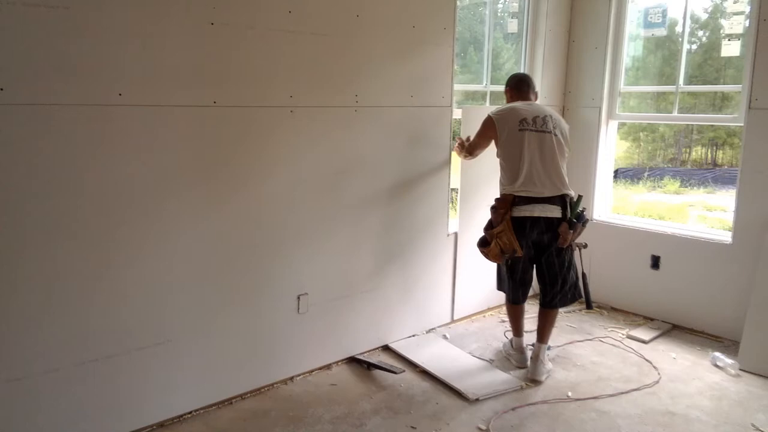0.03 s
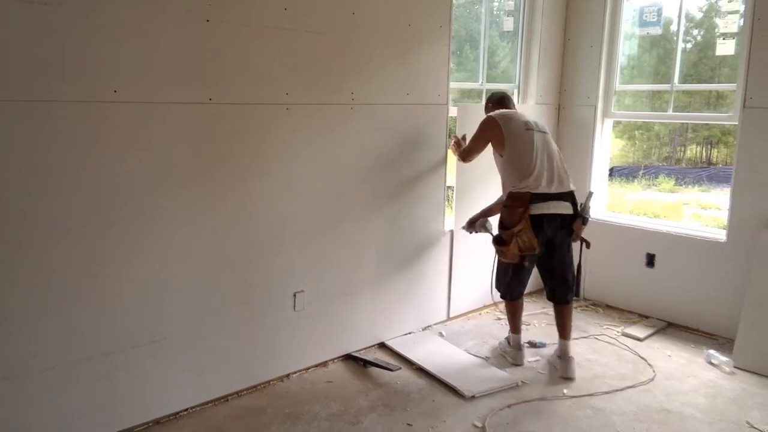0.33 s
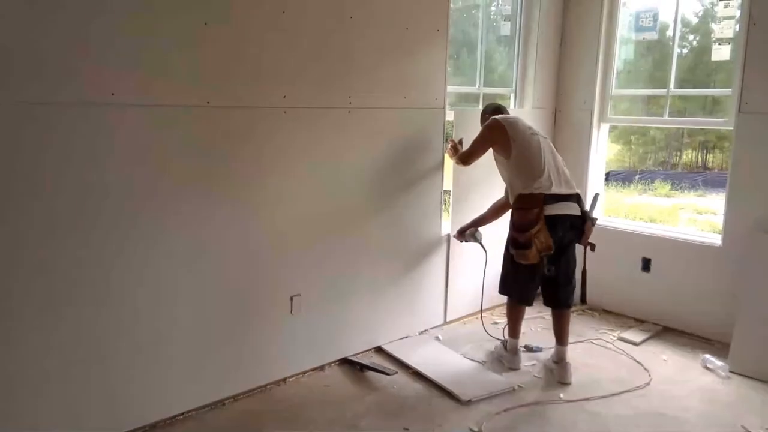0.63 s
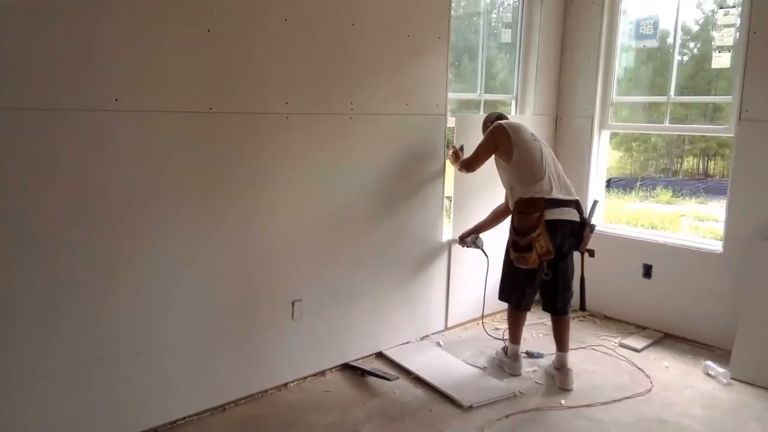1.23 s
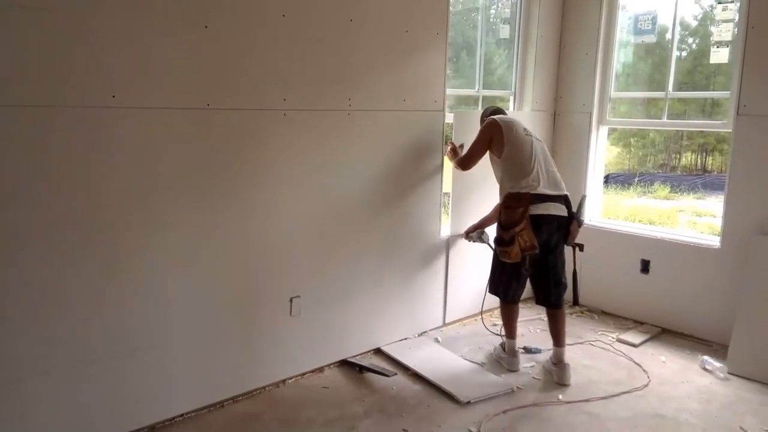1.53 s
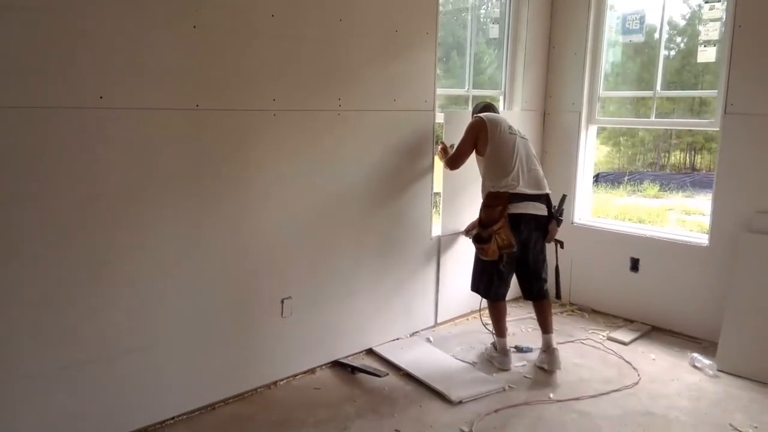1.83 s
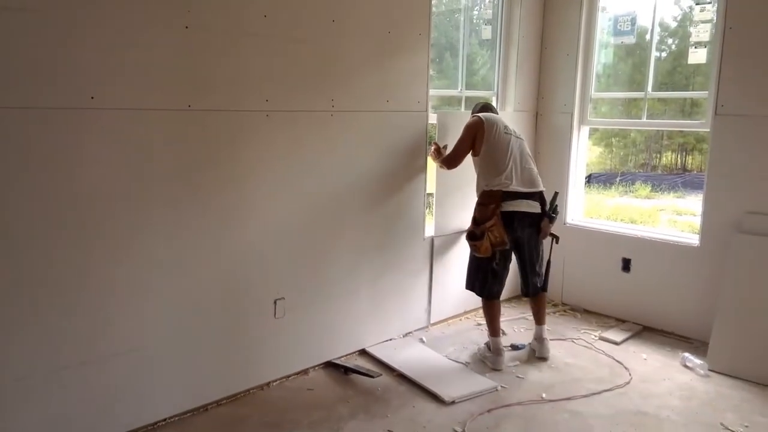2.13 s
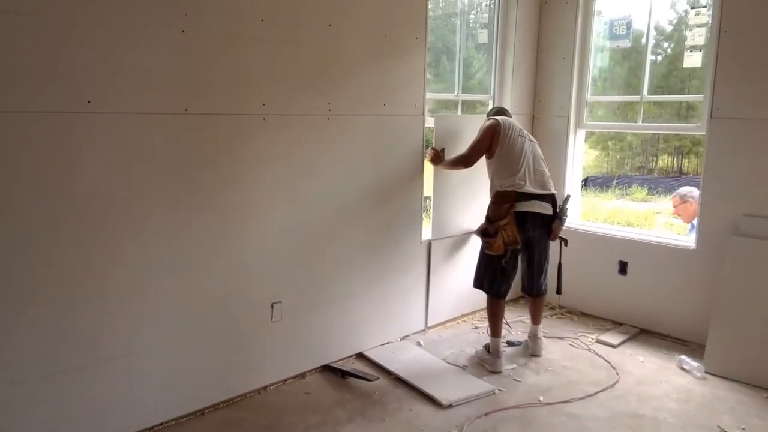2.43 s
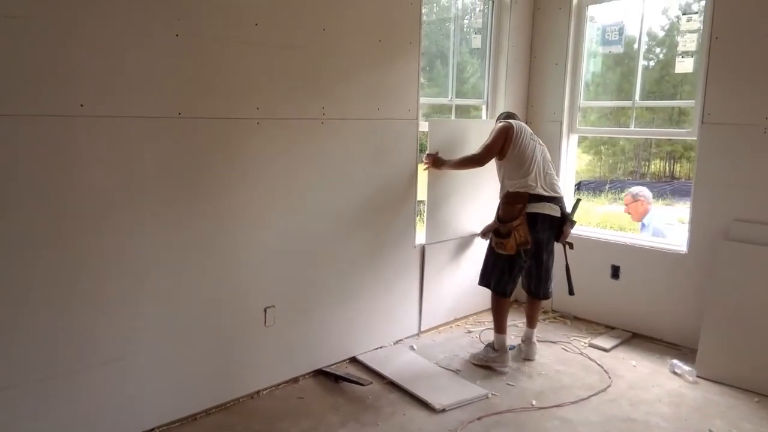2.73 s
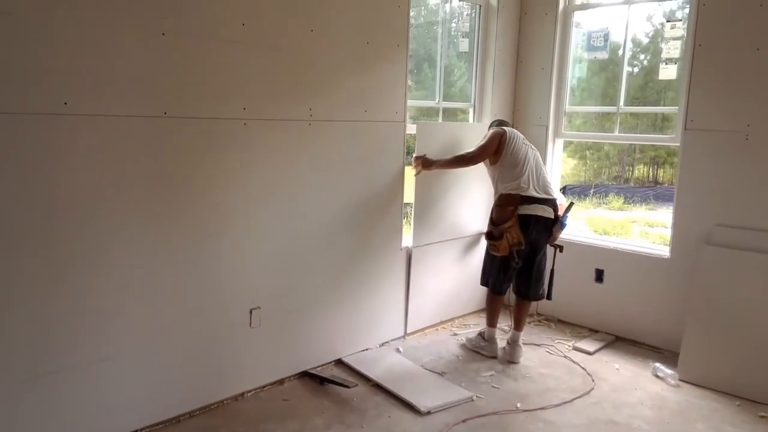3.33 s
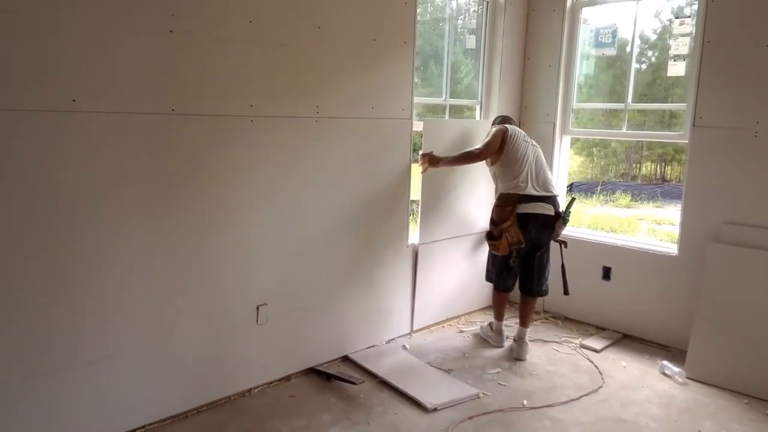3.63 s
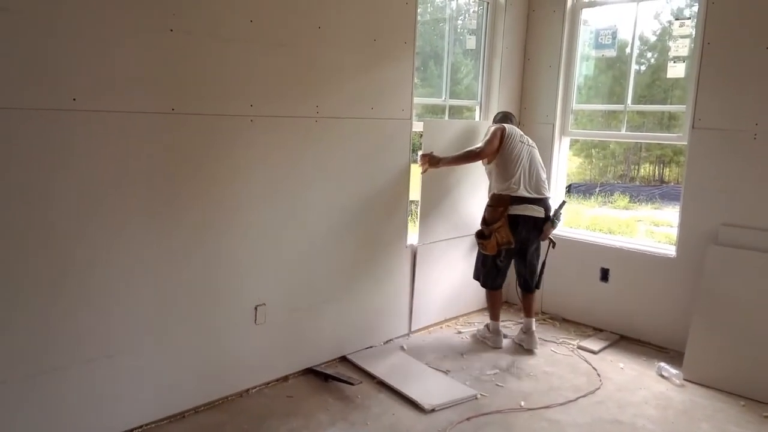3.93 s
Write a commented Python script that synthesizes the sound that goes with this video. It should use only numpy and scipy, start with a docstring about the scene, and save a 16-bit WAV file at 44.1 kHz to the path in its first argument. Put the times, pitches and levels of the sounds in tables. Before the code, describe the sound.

A corded rotary tool runs with an airy whine, then bites into drywall and screams steadily, with squeals and gritty grinding. The cut eases near the end. It is heard from a few metres away in a bare, echoing room.

```python
"""Rushing air, a fan whistle and a shaft hum fade in: a corded rotary cut-out tool spinning free,
a few metres away in a bare, unfinished room. Then the bit bites into drywall and screams on multiples
of the shaft rate, which sags under load and recovers as the cut eases. Single overtones flare into
squeals, and every tone beats with its own echoes. The sheet rumbles when pushed, grinds under the
bit and scrapes once."""
import sys
import numpy as np
from scipy import signal
from scipy.fft import rfft, irfft
from scipy.io import wavfile
from scipy.ndimage import uniform_filter1d

SR = 44100
rng = np.random.default_rng(int(sys.argv[2]) if len(sys.argv) > 2 else 0)


def bounce(signal):
    """Save signal as a 16-bit WAV file at the path given by the first command-line argument."""
    frames = np.transpose(np.atleast_2d(signal))
    limited = np.clip(frames, -1, 1)
    pcm = np.round(limited * 32767).astype(np.int16)
    wavfile.write(sys.argv[1], SR, pcm)


N = 176400
T = np.arange(N) / SR
BITE_S = .865   # the bit enters the board

# Loudness of the cut, ridden by both scream and grinding: time_s, level_db
CUT_LEVEL = [(.78, -44), (.86, -39), (.885, -23), (.95, -29), (1.02, -26), (1.12, -26), (1.26, -27),
             (1.38, -19.5), (1.64, -18), (1.71, -21), (1.78, -18.5), (2.42, -19), (2.53, -20), (2.63, -16),
             (2.75, -17.5), (2.98, -17), (3.25, -18.5), (3.48, -18.5), (3.6, -19.5), (3.78, -19.5),
             (3.92, -29.5)]


def from_db(db):
    """Decibels to gain."""
    return 10 ** (np.asarray(db) / 20)


def unit_rms(x):
    """Scale to rms 1."""
    return x / np.sqrt(np.mean(np.abs(x) ** 2) + 1e-20)


def automation(points, lead_s=0):
    """Straight ramps between (time_s, value) points, held at both ends."""
    return np.interp(T + lead_s, *np.transpose(points))


def drift(rate_hz):
    """A smooth random wander with rms near 1."""
    hop, settle = 40, 2000
    pole = np.exp(-2 * np.pi * hop * rate_hz / SR)
    white = rng.standard_normal(N // hop + settle + 2)
    slow = signal.lfilter([1], [1, -2 * pole, pole * pole], white)[settle:]
    return np.interp(np.arange(N) / hop, np.arange(len(slow)), unit_rms(slow))


def coloured_noise(colour):
    """Noise shaped by an EQ curve of (frequency_hz, gain_db) points, at rms 1."""
    hz, db = np.transpose(colour)
    bin_hz = np.maximum(np.arange(N // 2 + 1) * SR / N, 1)
    eq = from_db(np.interp(np.log(bin_hz), np.log(hz), db))
    return unit_rms(irfft(rfft(rng.standard_normal(N)) * eq, N))


def swell(peak_s, half_width_s):
    """A rise, short hold and fall: a bell with a flattened top."""
    return np.exp(-.5 * np.abs((T - peak_s) / half_width_s) ** 3)


def decay(start_s, decay_s):
    """A sudden attack and an exponential fall."""
    return (T > start_s) * np.exp(-np.abs(T - start_s) / decay_s)


def bare_room(reverb_db):
    """The direct sound plus a dense tail off bare walls, its energy reverb_db against the direct."""
    t60_s, first_echo_s = .59, .004
    t = T[:SR]
    response = rng.standard_normal(SR) * from_db(-60 * t / t60_s) * (t > first_echo_s)
    response *= from_db(reverb_db) / np.linalg.norm(response)
    response[0] = 1
    return response / np.linalg.norm(response)


def tone_in_room(phase, room, levelling_s=.15):
    """A complex tone beating with its own echoes, levelled so its real part stays near rms 1."""
    wet = signal.fftconvolve(np.exp(1j * phase), room)[:N]
    window = int(levelling_s * SR)
    power = uniform_filter1d(np.abs(wet) ** 2, window)
    power = uniform_filter1d(power, window // 2) + 1e-12
    return np.sqrt(2 / power) * wet


def shaft_spin():
    """Shaft rate and angle: nearly steady when free, sagging and unsteady in the board."""
    # Shaft rate through the cut: time_s, rate_hz
    cutting_speed = [(0.88, 497.6), (1.22, 483.8), (1.23, 493), (1.51, 485), (1.86, 489.2), (2.25, 479),
                     (2.39, 475.7), (2.54, 469.8), (3.5, 467.7), (3.75, 499.8), (3.78, 506.4), (3.98, 500),
                     (4.0, 502)]
    free_hz, free_wobble, cut_wobble = 497.7, .00062, .001585   # wobble is a share of the rate
    cutting = T > BITE_S
    cutting_hz = automation(cutting_speed, lead_s=.01996)   # the shaft changes pace ahead of the room
    shaft_hz = np.where(cutting, cutting_hz, free_hz)
    wobble = np.where(cutting, cut_wobble, free_wobble) * drift(rate_hz=14)
    return shaft_hz, 2 * np.pi * np.cumsum(shaft_hz * (1 + wobble)) / SR


def air_rush(angle):
    """Cooling air and gypsum dust, flickering and pulsing a little with each turn."""
    # Level of the hiss as heard, including the recorder's gain drop at the bite: time_s, level_db
    hiss_level = [(.4, -19.5), (.55, -18), (.68, -20.5), (.85, -16.5), (.885, -26), (1.0, -30),
                  (1.12, -25.5), (1.25, -27), (2.4, -27), (3.4, -28.5), (3.8, -25), (4, -22.5)]
    # Bright, breathy EQ of the airflow: frequency_hz, gain_db
    air_colour = [(15, -60.5), (40, -55.5), (95, -44.5), (130, -36), (220, -37.5), (300, -28), (560, -15),
                  (850, -6.5), (1100, -6.5), (1350, 3.5), (1650, -1.5), (2000, -1), (2600, -1.5), (3500, 5),
                  (4300, -0.5), (5100, -5.5), (5900, -14.5), (6500, -27), (7000, -39.5)]
    pulse_depth, flicker_db = .13, 1.0
    flow = coloured_noise(air_colour) * (1 + pulse_depth * np.cos(angle))
    return flow * from_db(automation(hiss_level) + flicker_db * drift(rate_hz=16))


def fan_whistle(angle):
    """The fan's fluttering whistle, dipping as the recorder's gain drops at the bite."""
    # Level of the whistle as heard: time_s, level_db
    whistle_level = [(.23, -39.5), (.255, -23.5), (.5, -22), (.67, -26), (.85, -16), (.872, -24.5),
                     (1.4, -33), (3.5, -35), (3.75, -20.5), (3.86, -31), (3.95, -27), (4, -22)]
    # Partials of the whistle: shaft_multiple, gain_db
    partials = [(7, -19.5), (8, 1), (12, -28.5)]
    gain_dip_db, flutter_db = -8, 2.0
    room = bare_room(reverb_db=10)
    whistle = sum(from_db(db) * tone_in_room(multiple * angle, room).real for multiple, db in partials)
    level_db = automation(whistle_level) + gain_dip_db * decay(BITE_S, decay_s=.06)
    return whistle * from_db(level_db + flutter_db * drift(rate_hz=21))


def shaft_hum(angle):
    """The unbalanced shaft hums at its turning rate, wavering in level."""
    # Level of the hum as heard: time_s, level_db
    hum_level = [(0.4, -38.5), (0.84, -36), (0.88, -53), (0.97, -32), (1.11, -47.5), (1.2, -38.5),
                 (1.59, -35), (1.69, -58), (1.82, -38), (2.01, -45), (2.17, -31), (3.37, -43.5),
                 (3.47, -37), (3.61, -54), (3.63, -40.5), (4.0, -47)]
    waver_db = 1.5
    hum = tone_in_room(angle, bare_room(reverb_db=-3.5)).real
    return hum * from_db(automation(hum_level) + waver_db * drift(rate_hz=21))


def sheet_rumble():
    """The drywall sheet gives a soft, low rumble at each push."""
    # Pushes on the sheet: peak_s, half_width_s, level_db
    pushes = [(.83, 0.025, -56.5), (1.43, 0.05, -59.5), (2.036, 0.046, -59), (2.88, 0.034, -63),
              (3.45, 0.062, -50.5)]
    # Bass-heavy EQ of the sheet: frequency_hz, gain_db
    sheet_colour = [(15, -22), (28, -8.5), (45, -6.5), (90, -11), (140, -0.5), (250, -5), (450, -3),
                    (900, -38.5)]
    envelope = sum(from_db(db) * swell(peak_s, half_width_s) for peak_s, half_width_s, db in pushes)
    return coloured_noise(sheet_colour) * envelope


def bit_scream(shaft_hz, angle):
    """The bit strikes the board on every turn; load broadens the scream and single overtones squeal."""
    # Overtones of the scream: shaft_multiple, light_load_db, heavy_load_db
    overtones = [(2, -20, -22), (3, -17, -17), (4, -13, -11), (5, -10, -9.5), (6, -7.5, -10), (7, -3.5, -6),
                 (8, -11, -8.5), (9, -14, -14.5), (10, -17, -19), (11, -24.5, -21), (12, -31.5, -19.5),
                 (13, -39, -37), (14, -52.5, -43)]
    # Flares of single overtones: peak_s, half_width_s, shaft_multiple, level_db
    squeals = [(0.906, 0.04, 7, -20), (0.889, 0.0098, 6, -19.5), (0.931, 0.031, 5, -24),
               (0.952, 0.023, 6, -19), (1.13, 0.011, 7, -30), (1.24, 0.046, 2, -32),
               (1.342, 0.02, 5, -29.5), (1.396, 0.063, 9, -27.5), (1.39, 0.04, 7, -29),
               (1.468, 0.072, 2, -28), (1.584, 0.044, 5, -23), (1.612, 0.04, 6, -25),
               (1.62, 0.077, 3, -35.5), (1.822, .055, 7, -24), (2.07, 0.066, 5, -29),
               (2.054, 0.032, 4, -25), (2.187, 0.019, 4, -24), (2.364, 0.079, 4, -25),
               (2.44, 0.042, 7, -19.5), (2.634, 0.023, 11, -37), (2.643, 0.042, 2, -34.5),
               (2.889, 0.048, 8, -27.5), (2.9, 0.017, 3, -33), (3.012, 0.067, 6, -28.5),
               (3.048, 0.068, 5, -21), (3.08, 0.084, 10, -32), (3.188, .045, 8, -24.5),
               (3.214, 0.072, 11, -33.5), (3.26, 0.063, 4, -28), (3.331, 0.068, 9, -29.5),
               (3.386, 0.031, 7, -28.5), (3.6, 0.057, 5, -23.5), (3.628, 0.069, 4, -33),
               (3.678, 0.021, 6, -26), (3.785, .04, 5, -25.5), (3.764, .06, 9, -34)]
    light_load_hz, heavy_load_hz = 488, 452.8
    chatter_rad = .031   # fast jitter of the bit in the board
    rasp_db, rasp_hz = -10, 35   # rough skirt around each overtone: relative level, width
    squeal_knee = .26   # the smaller, the less a squeal fades with the echoes
    load = np.clip((light_load_hz - shaft_hz) / (light_load_hz - heavy_load_hz), 0, 1)
    bit_angle = angle + chatter_rad * drift(rate_hz=54)
    cut_db = automation(CUT_LEVEL)
    room = bare_room(reverb_db=5.5)
    scream = 0
    for multiple, light_db, heavy_db in overtones:
        gain = from_db(cut_db + light_db + load * (heavy_db - light_db))
        flare = sum(from_db(db) * swell(peak_s, half_width_s)
                    for peak_s, half_width_s, flaring, db in squeals if flaring == multiple)
        phase = multiple * bit_angle + rng.uniform(0, 2 * np.pi)
        tone = tone_in_room(phase, room)
        squeal = tone.real / np.sqrt(np.abs(tone) ** 2 / 2 + squeal_knee)
        rasp = drift(rasp_hz) * np.cos(phase) + drift(rasp_hz) * np.sin(phase)
        rasp_gain = from_db(rasp_db) * np.hypot(gain, flare)
        scream += gain * tone.real + flare * squeal + rasp_gain * rasp
    return scream


def board_grind():
    """Gypsum grinds and the board drones under the bit, a noise bed beneath the scream."""
    # EQ of the grinding and drone: frequency_hz, gain_db
    grind_colour = [(15, -53), (50, -41.5), (100, -33), (135, -23.5), (190, -29), (245, -20), (300, -24.5),
                    (560, -14), (900, -6), (1150, -6.5), (1400, -1.5), (2000, -6), (2700, -3), (3400, 3),
                    (4300, -0.5), (5100, -10.5), (6000, -20), (7000, -40)]
    trim_db = -9
    return coloured_noise(grind_colour) * from_db(automation(CUT_LEVEL) + trim_db)


def bit_scrape():
    """One brief, bright scrape of the bit early in the cut."""
    # Treble-heavy EQ of the scrape: frequency_hz, gain_db
    scrape_colour = [(15, -70), (1500, -22), (3000, -6), (4100, -1), (5000, -6.5), (7000, -42)]
    level_db = -20
    return coloured_noise(scrape_colour) * from_db(level_db) * decay(start_s=1.088, decay_s=.037)


def scene():
    """Tool and drywall mixed to mono, with every tone locked to the one shaft."""
    shaft_hz, angle = shaft_spin()
    tool = air_rush(angle) + fan_whistle(angle) + shaft_hum(angle)
    cut = sheet_rumble() + bit_scream(shaft_hz, angle) + board_grind() + bit_scrape()
    return (tool + cut)[None]


def record(dry):
    """Fade in from silence and cut the top end steeply."""
    start_s, fade_s, fade_offset, fade_curve = .2, .26, .057, 1.17
    cutoff_hz = 7050
    ramp = np.clip((T - start_s) / fade_s + fade_offset, 0, 1)
    fade = ramp ** fade_curve * (T > start_s)
    low_pass = signal.ellip(12, .1, 90, cutoff_hz, fs=SR, output="sos")
    return signal.sosfilt(low_pass, dry * fade)


dry = scene()
out = record(dry)
bounce(out)
```